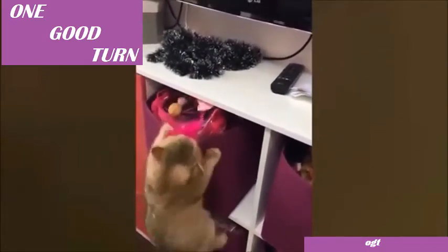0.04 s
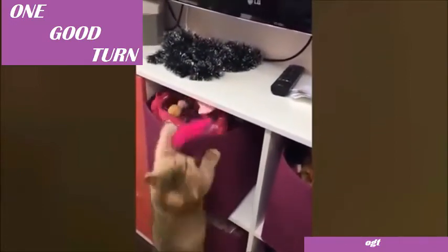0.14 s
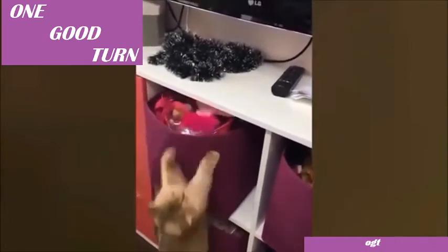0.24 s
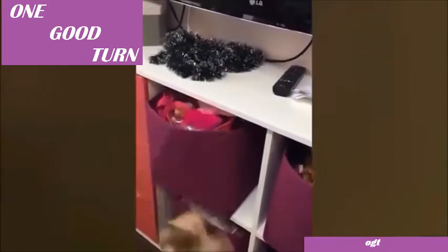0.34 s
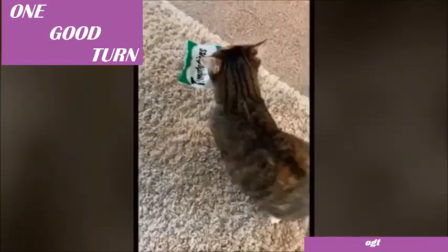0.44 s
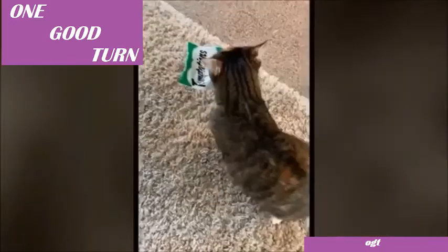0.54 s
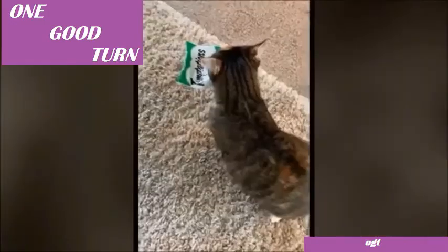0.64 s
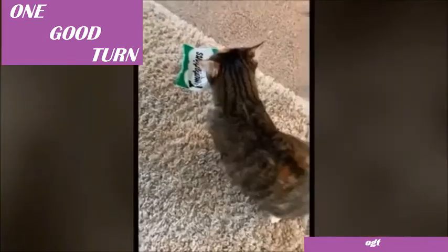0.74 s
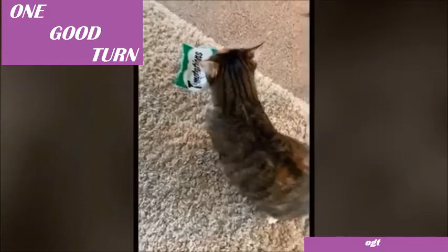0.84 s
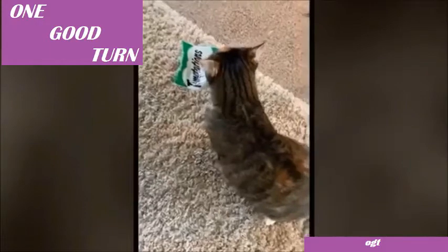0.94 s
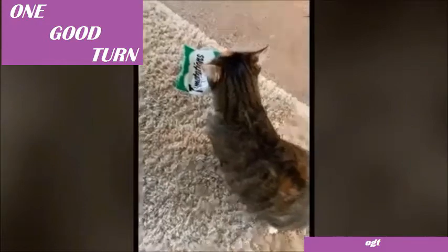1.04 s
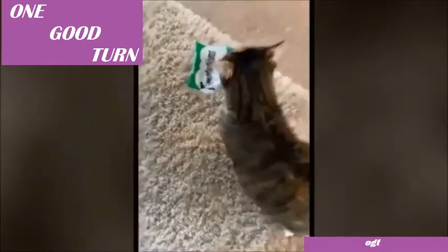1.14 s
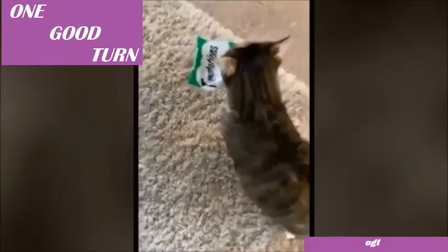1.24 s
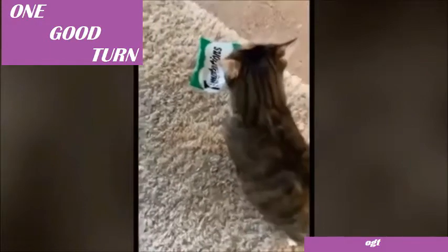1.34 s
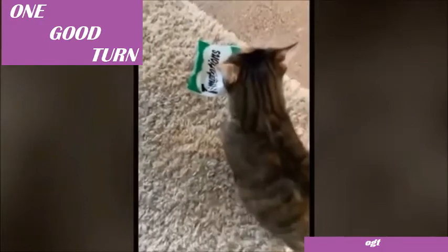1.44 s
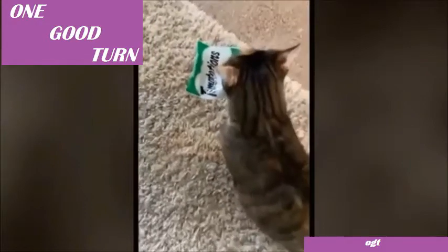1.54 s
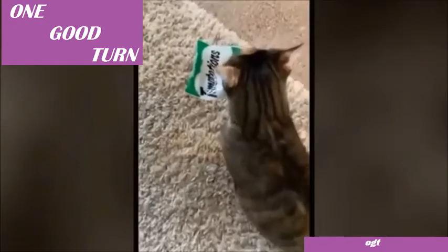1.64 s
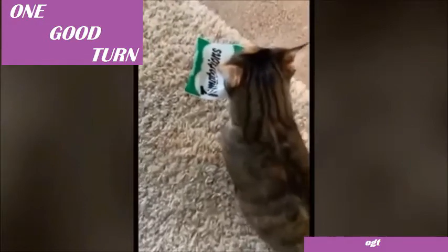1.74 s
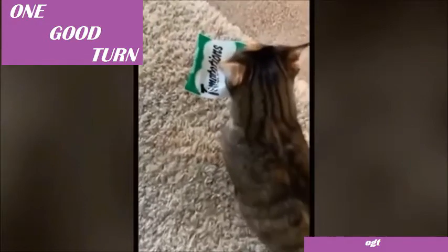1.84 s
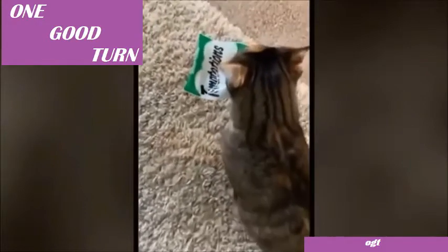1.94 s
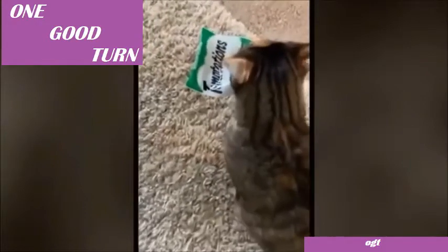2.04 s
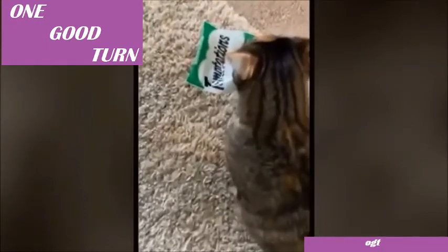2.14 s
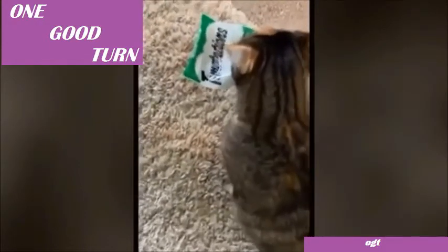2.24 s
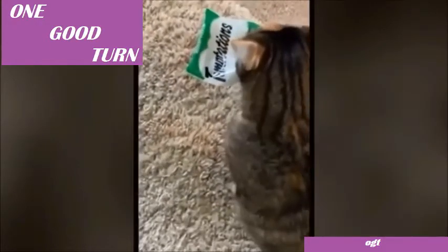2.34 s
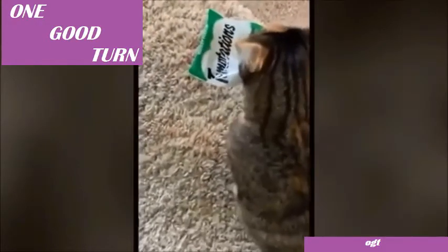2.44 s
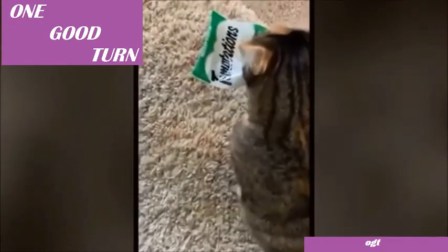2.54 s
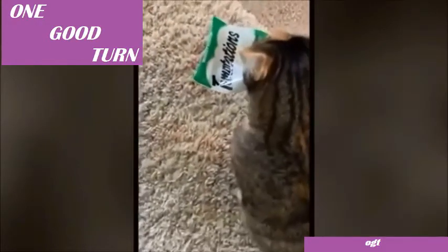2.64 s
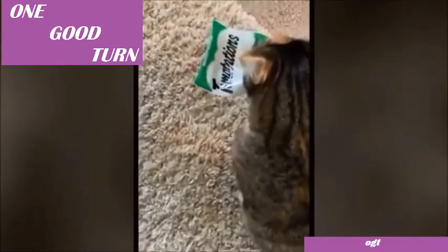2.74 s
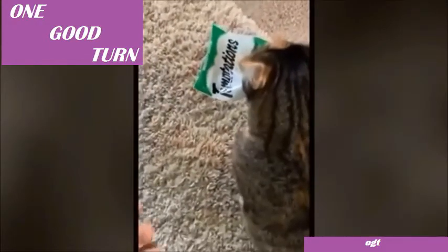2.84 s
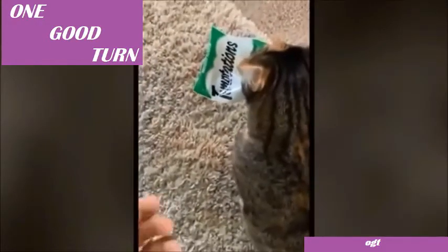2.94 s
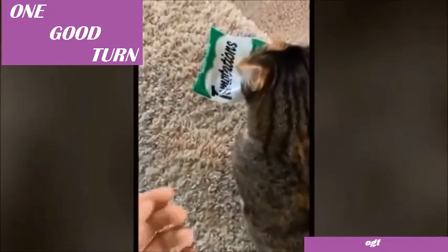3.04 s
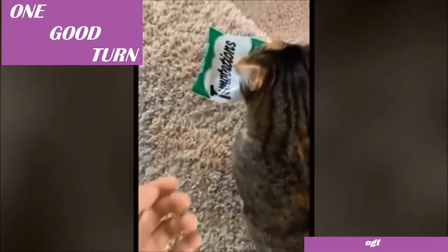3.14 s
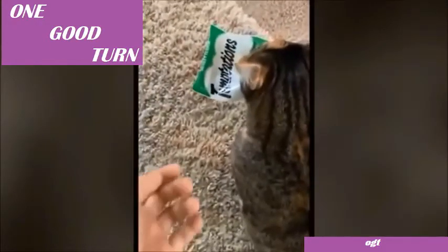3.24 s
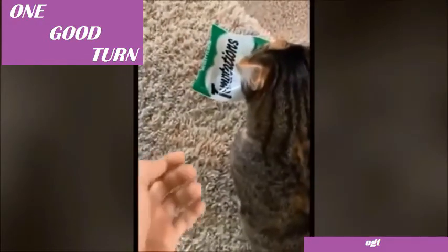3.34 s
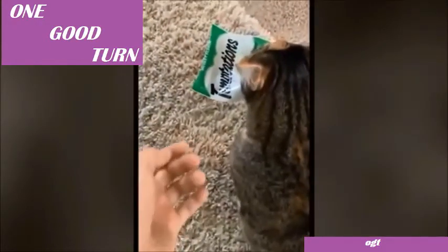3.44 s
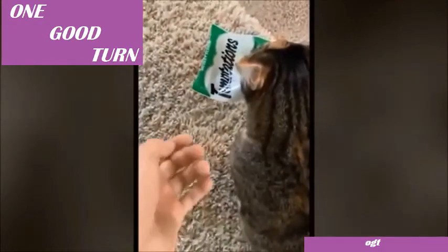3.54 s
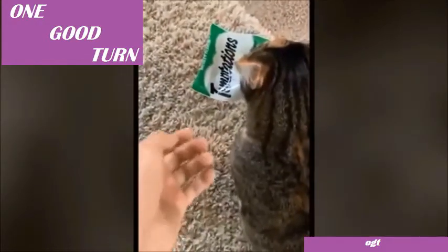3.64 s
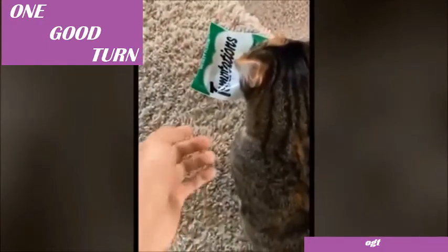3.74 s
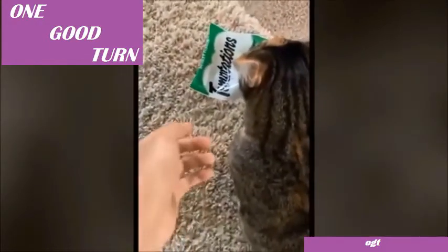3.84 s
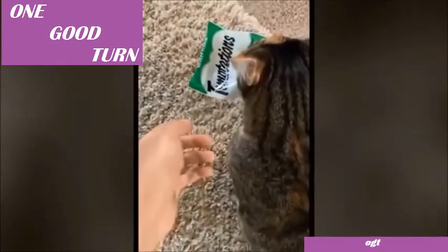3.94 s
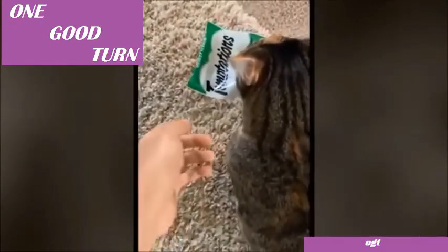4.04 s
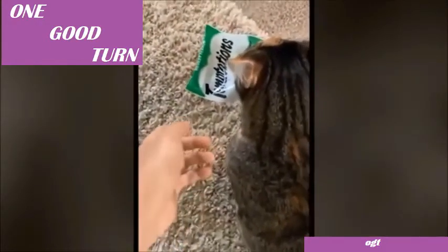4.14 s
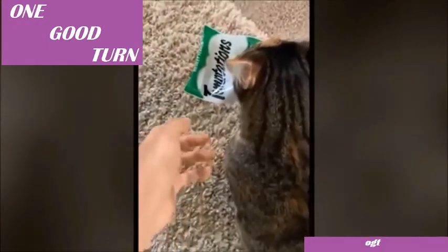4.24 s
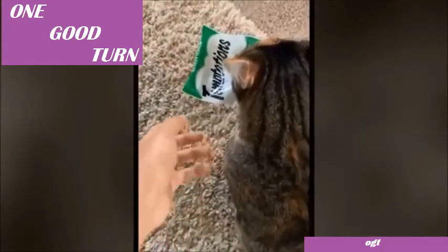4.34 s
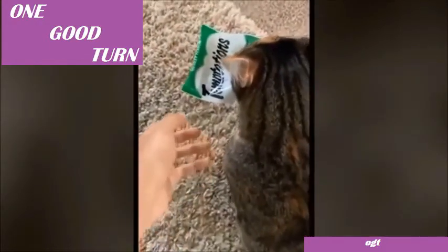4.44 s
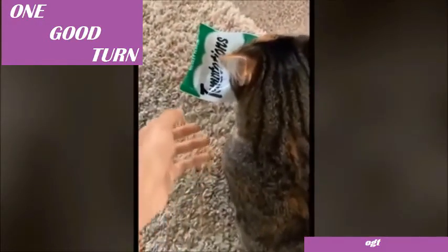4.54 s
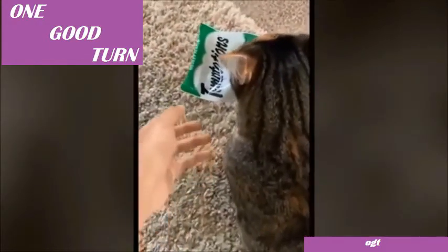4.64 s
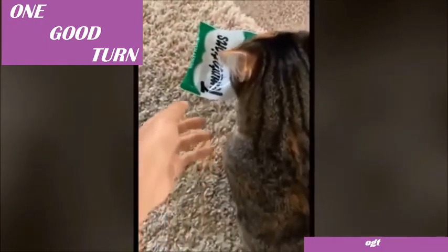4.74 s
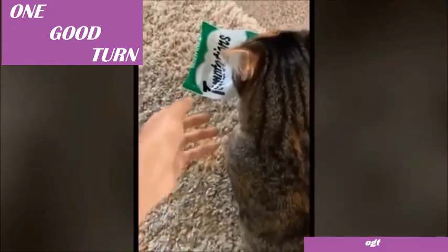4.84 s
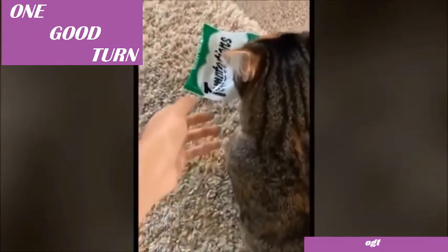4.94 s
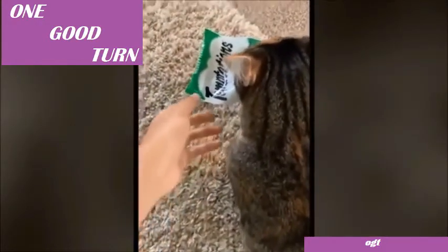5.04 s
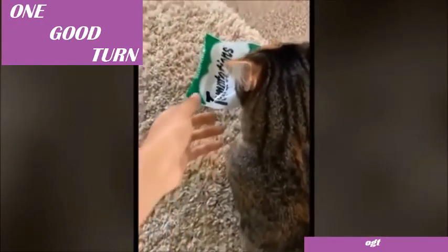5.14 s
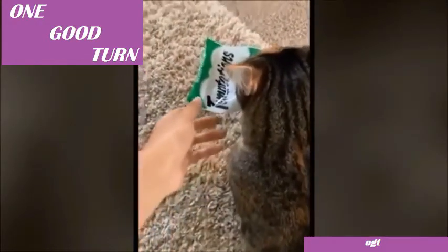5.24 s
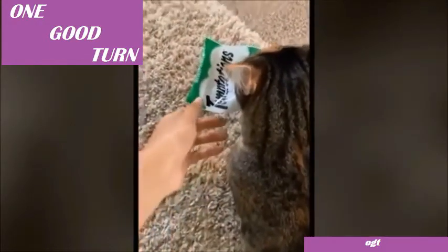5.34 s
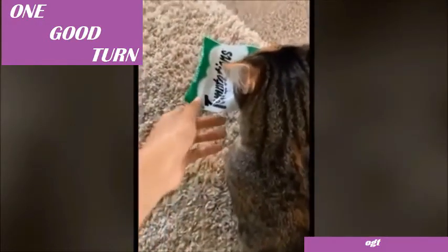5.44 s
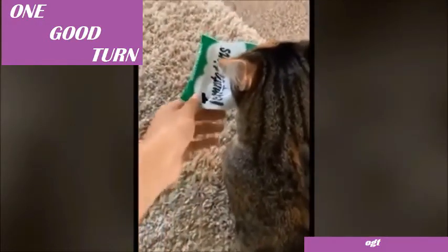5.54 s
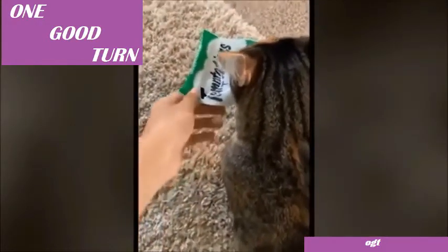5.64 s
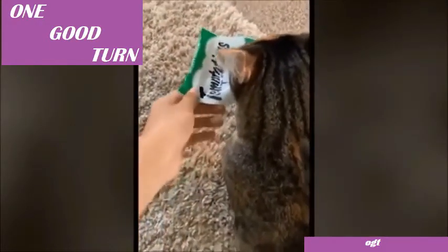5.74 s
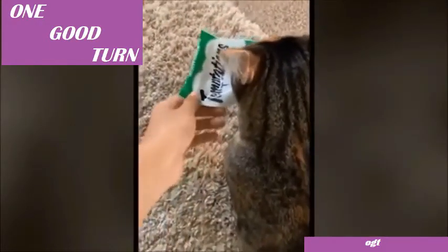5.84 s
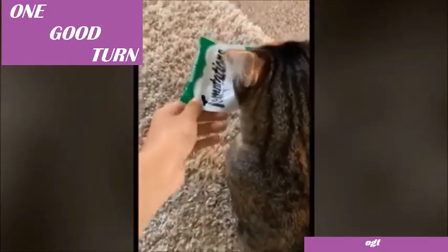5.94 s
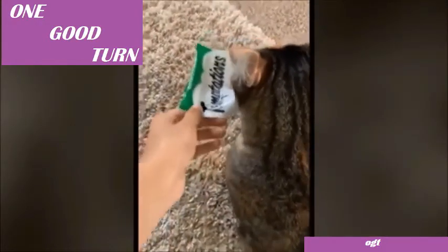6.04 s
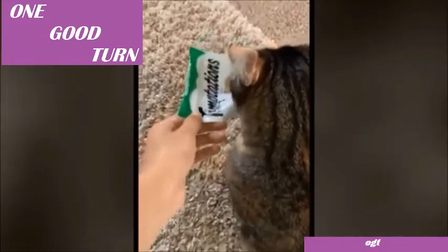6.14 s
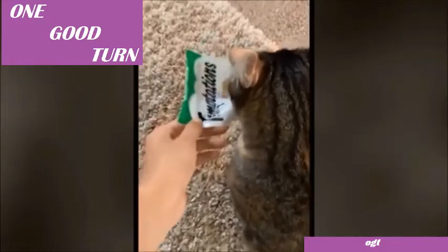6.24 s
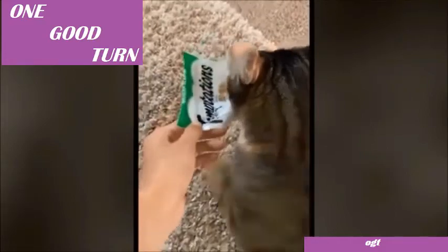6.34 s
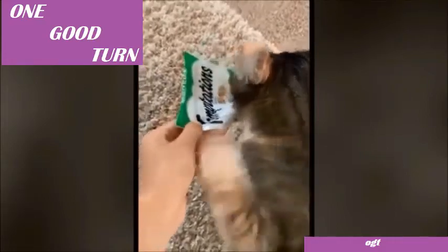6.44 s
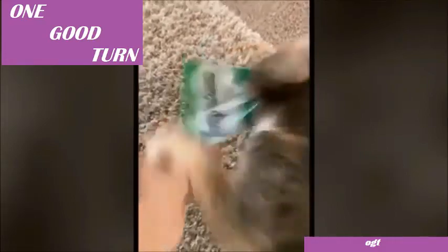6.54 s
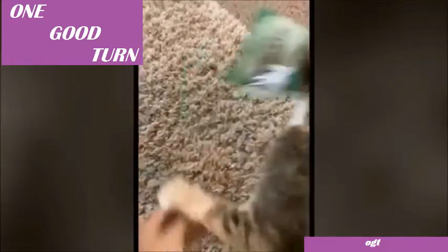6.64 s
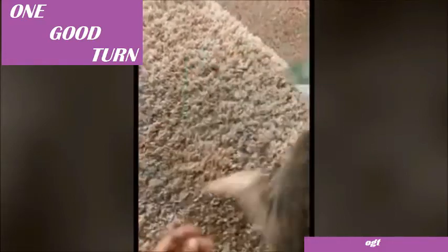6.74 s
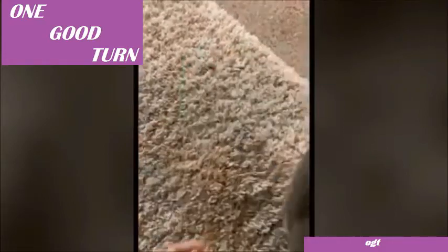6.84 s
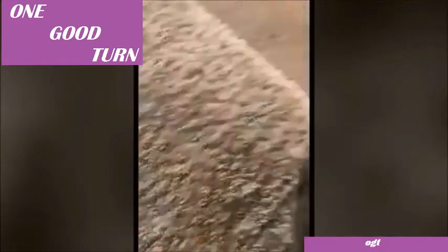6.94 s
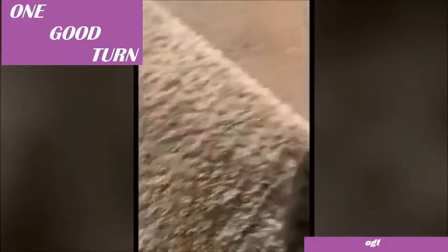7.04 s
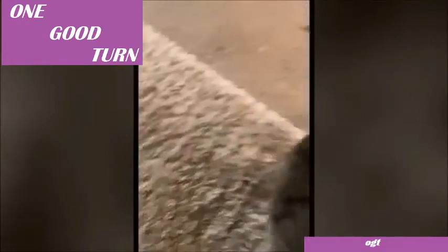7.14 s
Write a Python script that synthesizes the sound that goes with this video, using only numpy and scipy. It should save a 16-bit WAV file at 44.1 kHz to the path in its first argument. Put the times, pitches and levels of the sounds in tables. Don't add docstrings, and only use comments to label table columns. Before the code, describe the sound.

A cat growls low and steadily close by, fades, then snarls harder as a plastic bag crackles and a paw swats it.

```python
import sys
import numpy as np
from scipy import signal
from scipy.fft import rfft, irfft
from scipy.io import wavfile
from scipy.ndimage import uniform_filter1d

SR = 44100
rng = np.random.default_rng(int(sys.argv[2]) if len(sys.argv) > 2 else 0)


def bounce(signal):
    frames = np.transpose(np.atleast_2d(signal))
    limited = np.clip(frames, -1, 1)
    pcm = np.round(limited * 32767).astype(np.int16)
    wavfile.write(sys.argv[1], SR, pcm)


def invert_db(x):
    u = np.asarray(x, float) / 20
    return 10 ** u


N = 317520


def evened(x):
    return x / np.sqrt(np.mean(x ** 2) + 1e-20)


def read(points, hz):
    f, value = np.transpose(points)
    return np.interp(np.log(hz + 1), np.log(f + 1), value)


def play(rows):
    s, *columns = np.transpose(rows)
    return [np.interp(np.arange(N) / SR, s, c) for c in columns]


def held(start, end, edge_s):
    t = np.arange(N) / SR
    return np.clip(np.minimum(t - start, end - t) / edge_s + .5, 0, 1)


def colour(x, points):
    return irfft(rfft(x) * invert_db(read(points, np.fft.rfftfreq(len(x), 1 / SR))), len(x))


def resonate(x, hz, width):
    turn = np.exp(2j * np.pi * np.cumsum(hz * np.ones(len(x))) / SR)
    r = np.exp(-np.pi * abs(width) / SR)
    smooth = signal.lfilter([(1 - r) ** 2], [1, -2 * r, r * r], x / turn)
    return 2 * (turn * smooth).real


def modes(x, table):
    return sum((-1) ** k * invert_db(db) * resonate(x, hz, width) for k, (hz, width, db) in enumerate(table))


def wander(seconds):
    span = max(round(seconds * SR), 1)
    return evened(uniform_filter1d(uniform_filter1d(rng.standard_normal(N), span), span))


# start_s, effort_db, pitch_hz, chest_hum_db, mouth_opening_db
STEADY_GROWL = [(.55, -50.5, 124.2, -41.5, -8.5), (.75, -51, 122.4, -43, -6.5),
                (1.2, -50, 122.6, -41.5, -6.5), (1.75, -49, 125, -44.5, -3),
                (1.97, -48, 125.9, -44.5, -3.5), (2.06, -48.5, 121.9, -45.5, -3.5),
                (2.27, -48.5, 120.5, -44, -3.5), (2.38, -47.5, 128.8, -43.5, -8),
                (2.58, -47, 127.2, -43.5, -6), (2.69, -48, 121, -43, -7), (2.8, -48.5, 124.3, -45.5, -6.5),
                (2.9, -48, 123.5, -46.5, -6.5), (3.05, -49, 123, -48, -6), (3.17, -47.5, 122.3, -45, -6),
                (3.27, -47.5, 122.7, -47, -9), (3.39, -50, 115.3, -47, -7.5), (3.84, -50, 115, -47.5, -9),
                (4.02, -50, 116.9, -50.5, -6.5), (4.24, -50.5, 114.9, -50.5, -6.5),
                (4.445, -50, 134.1, -45.5, -5.5)]
FADING_GROWL = [(4.459, -62, 172, -41.5, -18), (4.51, -62, 196.9, -44, -20),
                (4.572, -63, 186.7, -41, -21.5), (4.582, -60, 166.9, -40, -21.5),
                (4.6, -54.5, 143.6, -44, -22.5), (4.685, -58, 143.7, -43, -23.5),
                (4.698, -55.5, 142.8, -40.5, -19.5), (4.754, -60.5, 143, -45.5, -20.5),
                (4.822, -57, 124, -49, -20), (4.873, -61.5, 126.3, -48, -26), (4.913, -67, 169, -49.5, -24),
                (4.94, -74, 159.8, -56, -19), (4.955, -80, 105.4, -55, -19.5),
                (5.01, -83, 95.4, -59, -18.5)]
SNARL = [(5.958, -69, 99.84, -58, -4.5), (5.985, -48, 105.1, -48, -12), (6.046, -43.5, 117.1, -41, -11),
         (6.115, -44.5, 118.1, -45, -10), (6.14, -41.5, 128.9, -37, -6.5), (6.198, -41, 130.1, -38, -8.5),
         (6.272, -40, 133.3, -38.5, -9.5), (6.352, -34, 148.2, -29, -11.5), (6.426, -34, 146.1, -32.5, -17),
         (6.489, -40.5, 142.4, -38.5, -2), (6.521, -36.5, 143.7, -34, -12.5),
         (6.55, -37, 145.3, -29.5, -16), (6.58, -38.5, 142.7, -24, -14.5), (6.593, -34.5, 137.8, -26.5, -9)]
RECOIL = [(6.61, -42.5, 111.1, -39.5, -9), (6.65, -43, 109, -34, -5.5), (6.68, -42.5, 107.9, -39, -3),
          (6.72, -41.5, 103, -40, -7.5), (6.755, -42.5, 102.2, -39, -10.5), (6.785, -43, 107.9, -44, -9),
          (6.805, -45.5, 134, -32, -9), (6.87, -46, 145.1, -33, -9), (6.93, -47, 133, -35, -11),
          (6.99, -47.5, 129.6, -32.5, -10), (7.03, -50.5, 124.8, -36.5, -11), (7.085, -49, 137.3, -34, -13),
          (7.14, -49, 127, -33.5, -10), (7.19, -49.5, 129.6, -33.5, -9)]
# centre_s, length_s, pitch_rise_hz
GULPS = [
    (2.156, 0.092, 6.5),
    (2.446, 0.12, 6.13),
    (2.978, 0.072, 9.1),
    (3.898, 0.07, 5.14),
    (4.34, 0.042, 7.6),
]


def phrases():
    def rest(s, row):
        return [(s, -95, row[2], -95, row[4])]

    pause = rest(5.06, FADING_GROWL[-1]) + rest(5.94, SNARL[0])
    effort_db, hz, hum_db, mouth_db = play(STEADY_GROWL + FADING_GROWL + pause + SNARL + RECOIL)
    rise_hz = sum(up_hz * held(s - length / 2, s + length / 2, 0.0056) for s, length, up_hz in GULPS)
    return effort_db, hz + rise_hz, hum_db + 0.25 * rise_hz, mouth_db - 0.5 * rise_hz


def chest(turns, hum_db, octave_db, split_db, shimmer_db):
    sway = turns + .028 * wander(.009)
    tone = invert_db(hum_db + np.minimum(shimmer_db, 1.7) * wander(.007)) * np.cos(2 * np.pi * sway + .6)
    octave_turns = sway + .004 * split_db * wander(.008)
    tone += invert_db(octave_db + shimmer_db * wander(.007)) * np.cos(4 * np.pi * octave_turns - .9)
    half_lines = np.cos(3 * np.pi * turns) + invert_db(-6.5) * np.cos(7 * np.pi * turns)
    tone += invert_db(octave_db - 25 + split_db + 0.98 * wander(0.081)) * half_lines
    return np.sqrt(2) * tone


# start_s, share_of_first, place_in_cycle (0-1)
REBOUND = [(.55, 0.19, 0.49), (1.2, 0.45, 0.51), (2, 0.15, 0.47), (2.6, 0.26, 0.44), (3.2, 0.17, 0.48),
           (3.5, 0.4, 0.47), (4, 0.31, .45), (4.45, 0.33, .45), (6, .2, 0.5), (7.2, 0.33, 0.44)]


def fold_drive(turns, hz, split_db, shimmer_db, rough):
    cycle = np.maximum.accumulate(turns + .014 * wander(.004)).astype(int)
    strength = invert_db(.9 * rng.uniform(-1, 1, N)[cycle] * shimmer_db)
    strength = strength * invert_db(-.22 * np.minimum(split_db, 20) * (cycle % 2))
    share, place = play(REBOUND)
    second_cycle = np.maximum.accumulate(turns - place + 1).astype(int)
    first = np.diff(cycle, prepend=0)
    second = np.diff(second_cycle, prepend=0)
    slaps = evened((first + share * second) * strength / np.sqrt(hz))
    single_slaps = evened(first * strength / np.sqrt(hz))
    puffs = evened((.45 + np.exp(-(turns % 1) / .4)) * rng.standard_normal(N))
    drive = np.sqrt(1 - rough) * slaps + np.sqrt(rough) * puffs
    deep = np.sqrt(1 - rough) * single_slaps + np.sqrt(rough) * puffs
    airy = np.sqrt(.85) * drive + np.sqrt(.15) * puffs
    return drive, deep, airy, puffs


# centre_hz, width_hz, level_db
LOWER_THROAT = [(367.5, 71, 1.5), (471.6, 92, 2.5), (650, 394, -6)]
# centre_hz, width_hz, level_db
UPPER_THROAT = [(1274, 250, 5.5), (1470, 120, 4.5), (1640, 190, 4.5), (2500, 1460, -6.5)]
# start_s, nose_hz, nose_db, favoured_mouth_hz, mouth_lift_db
TONGUE = [(.55, 994, 3.5, 1525, 5), (.82, 950, 6, 1470, 7), (.95, 963, 4.5, 1344, 2),
          (1.25, 978, 4.5, 1384, 6), (1.38, 976, 3.5, 1500, 8), (1.6, 1004, 3.5, 1467, 9),
          (1.88, 1046, 1, 1507, 0), (2.34, 1025, 4.5, 1557, 1), (2.42, 969.4, -1, 1470, 4),
          (2.53, 935.6, 3, 1495, 8), (2.62, 1046, 4, 1640, 1), (2.92, 1040, 1, 1640, -3),
          (2.98, 960, 2.5, 1460, 9), (3.08, 1020, 2, 1450, 6.5), (3.3, 986, 4.5, 1460, 12),
          (3.44, 963.3, 2.5, 1635, -1), (3.86, 930.5, 4, 1660, -6), (4.0, 1050, 1.5, 1610, 4),
          (4.19, 1070, 2, 1657, -2.5), (4.42, 1001, 2.5, 1640, -5), (4.9, 944, 0, 1497, 5),
          (5.97, 954, 2.5, 1601, 1.5), (6.15, 933, 7, 1630, -2), (6.35, 958, 3, 1630, -7),
          (6.55, 950.5, 0, 1550, 11), (6.6, 1038, 0, 1346, 4), (6.65, 1040, 2, 1340, 1),
          (6.665, 1148, -1, 1430, 0), (6.7, 1100, 7, 1440, 11), (6.715, 900, -2, 1241, 6),
          (6.78, 915, -6, 1202, 12), (6.8, 920, 3, 1185, -1), (6.86, 878, 1, 1130, 16),
          (6.88, 893, 0.5, 1450, 6), (7.2, 896, 1.5, 1454, 2)]
# start_s, centre_hz, level_db
LIPS = [(.55, 3600, 3), (.75, 3680, -0.5), (1.2, 3660, 1), (1.45, 3610, 0.5), (2.0, 3510, 2),
        (2.3, 3500, 2.5), (2.46, 3500, 2), (2.63, 3580, 0), (3.1, 3600, 1), (3.6, 3620, 1), (3.95, 3550, 3),
        (4.44, 3630, 0), (5.95, 3799, -4), (6.12, 3850, 2), (6.14, 3900, 5), (6.22, 3870, 1),
        (6.26, 3880, 4), (6.36, 3796, 1), (6.6, 3830, 5), (6.8, 3773, 5.5), (7.2, 3730, 0)]


def throat(drive, deep, airy, puffs, mouth_db, jaw, gape):
    nose_hz, nose_db, tongue_hz, tongue_db = play(TONGUE)
    lower = evened(modes(deep, LOWER_THROAT) - invert_db(nose_db) * resonate(drive, nose_hz, 189))
    cheek_hz = 456 + 83.96 * gape
    cheek_db = -97 + 104.5 * jaw
    lower += invert_db(cheek_db) * evened(resonate(drive, cheek_hz, 99)) / 3

    favoured = invert_db(tongue_db + 8.0) * resonate(drive, tongue_hz, 78)
    upper = evened(modes(airy, UPPER_THROAT) + favoured)
    rasp_hz, rasp_width_hz, rasp_db = 2514, 784, -10.5
    upper += invert_db(rasp_db + 0.58 * (mouth_db + 10.5)) * evened(resonate(airy, rasp_hz, rasp_width_hz))
    teeth_db = -17 - 7 * gape + .9 * (mouth_db + 8) + 1.2 * wander(.01)
    lips_hz, lips_db = play(LIPS)
    teeth = resonate(airy + .5 * puffs, lips_hz + 25 * wander(0.034), 280)
    upper += invert_db(teeth_db + lips_db) * evened(teeth)
    return lower, upper


# start_s, drop (0-1)
JAW = [
    (5.8, 0.34),
    (5.95, 0.67),
    (6.56, 0.73),
    (6.6, 1),
    (6.77, 0.99),
    (6.8, 0.66),
    (7.2, 0.58),
]
# octave_hz, level_db (re effort)
OCTAVE = [(200, 8), (232, 8), (246, 4.5), (264, 1), (285, -2), (296, -4.5), (370, -13)]
# start_s, end_s, octave_loss_db (added), half_line_gain_db
SPLITS = [
    (4.271, 4.454, 4, 5),
    (4.61, 4.902, -1, 12.5),
    (6.123, 6.337, 0, 17.5),
    (6.34, 6.61, -18.5, 33),
    (6.603, 6.79, -5, 23),
    (6.797, 7.299, 1.5, 14.5),
]


def growl():
    effort_db, hz, hum_db, mouth_db = phrases()
    jaw = np.clip(play(JAW)[0], 0, 1)
    gape = np.clip(4 * jaw - 3, 0, 1)
    shut = np.clip((-mouth_db - 14) / 8, 0, 1)
    loss_db, split_db = sum(np.outer(row[2:], held(*row[:2], 0.0076)) for row in SPLITS)
    octave_db = effort_db + read(OCTAVE, 2 * hz) + 8 * shut + loss_db
    rough = .13 + .3 * shut + .36 * jaw ** 5
    shimmer_db = 1.2 + 2.5 * rough
    turns = np.cumsum(hz * (1 + (.008 + .03 * rough) * wander(.014))) / SR
    tone = chest(turns, hum_db, octave_db, split_db, shimmer_db)
    source = fold_drive(turns, hz, split_db, shimmer_db, rough)
    lower, upper = throat(*source, mouth_db, jaw, gape)
    return tone, -invert_db(effort_db) * (lower + invert_db(mouth_db) * upper)


# centre_hz, level_db (per Hz)
RUMBLE = [(15, -55), (25, -21), (70, 1.5), (221, -20), (319, -20.5), (579, -27), (958, -27), (1100, -28),
          (1260, -28.5), (1950, -33.5), (2290, -38), (6000, -47), (7800, -61), (13200, -120)]
# centre_hz, level_db
FIZZ_LOW = [(2400, -0.5), (4100, -3), (6600, -8), (7300, -8), (8000, -17.5), (9000, -60)]
# centre_hz, level_db
FIZZ_HIGH = [(7000, -16), (8300, -3), (9000, 0), (12800, -1), (14900, -3.5), (16000, -22)]
# centre_s, length_s, fizz_db
BRUSHES = [
    (0.65, 0.25, -70.5),
    (1.02, 0.39, -71.5),
    (2.406, 0.72, -68.5),
    (3.098, 1, -71),
    (3.796, 1, -75),
    (4.85, 0.39, -76),
    (5.971, 0.1, -59),
    (6.284, 0.14, -73),
    (6.56, 0.55, -64),
    (7.157, 0.82, -65.5),
]
# start_s, top_edge_hz, hiss_db
TREBLE = [(.5, 15010, 1.5), (1.15, 15050, -0.5), (1.3, 15000, 0.5), (2.08, 15000, -0.5), (2.12, 15050, 0),
          (5.36, 15050, 0), (5.365, 13600, 9), (5.385, 13800, -1), (5.41, 14600, 1), (5.6, 14300, -3.5),
          (5.8, 14300, -0.5), (5.91, 15070, 1), (5.925, 16100, -8), (5.945, 16050, 9), (5.96, 14900, -1.5),
          (6.38, 14900, 3.5), (6.39, 15400, 0), (6.5, 15300, 2), (6.52, 15050, -1.5), (7.2, 15050, 0.5)]


def air():
    t = np.arange(N) / SR
    swell_db = 1.0 * wander(.04)
    rumble = invert_db(-56.5 + swell_db) * evened(colour(rng.standard_normal(N), RUMBLE))
    effort_db = np.minimum(phrases()[0], -48)
    brush = sum(invert_db(db) * np.cos(np.pi * np.clip((t - s) / length, -.5, .5)) for s, length, db in BRUSHES)
    fizz = np.zeros(N)
    for band, rest_db, breath_db, brush_db in ((FIZZ_LOW, -72.5, -20, 4.5), (FIZZ_HIGH, -78.5, -43, -1.5)):
        breath = invert_db(effort_db + breath_db)
        level = np.sqrt(invert_db(rest_db) ** 2 + breath ** 2 + (invert_db(brush_db) * brush) ** 2)
        fizz += level * evened(colour(rng.standard_normal(N), band))
    flutter_db = 0.35 * swell_db + 0.61 * wander(0.0064) + play(TREBLE)[1]
    band_hiss = evened(resonate(rng.standard_normal(N), 7800, 900))
    fizz += invert_db(-87) * held(4.55, 8, .2) * band_hiss
    return rumble + invert_db(flutter_db) * fizz


# start_s, peak_db, crease_pitch_hz, level_over_6_khz_db (re peak), burst_t60_s
SNAPS = [(1.03, -61, 5000, 8, 0.036), (2.106, -45, 2962, -29, 0.17), (5.3692, -34.5, 2310, -8, 0.027),
         (5.385, -41, 1300, -25, .02), (5.392, -42, 1500, -25, 0.023), (5.417, -50, 2000, -17, 0.019),
         (5.425, -56, 2000, -20, .015), (5.9356, -21, 2630, -3, 0.012), (5.9379, -34, 3207, -3, 0.018),
         (6.0066, -24, 2589, -9, 0.013), (6.018, -46, 2500, -25, .012), (6.1324, -33, 2370, -28, 0.013),
         (6.127, -51, 3500, -25, .02), (6.045, -47, 3002, -27, .015), (6.158, -51, 3800, -25, .012),
         (6.187, -47, 2600, -25, .012), (6.2287, -30, 2500, -21, 0.015), (6.235, -38.5, 3500, -22, .03),
         (6.2645, -31, 3016, -14, 0.021), (6.283, -53, 7000, 1, .03), (6.2896, -32.5, 2390, -8.5, 0.018),
         (6.378, -33, 2500, -25, 0.016), (6.3882, -23.5, 2800, -1, 0.014), (6.394, -22, 3100, -5, 0.015),
         (6.4148, -19.5, 2730, -0.5, 0.02), (6.4361, -16, 2800, -17, 0.033),
         (6.447, -16.5, 2000, -22, 0.022), (6.453, -31, 3050, -5, 0.016), (6.462, -24, 3122, -13, 0.024),
         (6.479, -24, 3200, -14, 0.016), (6.486, -22.5, 3250, -11, 0.025), (6.487, -23.5, 7200, -3, 0.036),
         (6.596, -31, 860, -40, 0.022), (6.6644, -28.5, 3500, -10, 0.024)]
# pitch_factor, width_factor (on pitch), level_db
FILM = [(.55, .6, -8), (1, .7, 0), (1.7, .9, -8)]
# centre_hz, width_hz, level_db
EDGE = [(5500, 2500, -9), (9000, 3500, 0), (12500, 3000, -7), (14800, 1500, -10)]


def snaps():
    out, t = np.zeros(N + 4000), np.arange(4000) / SR
    chance = rng.standard_normal((len(SNAPS), 4000))
    for (s, db, hz, high_db, t60), jolts in zip(SNAPS, chance):
        fizz = jolts * invert_db(-60 * t / max(t60, .002)) * np.minimum(t / 0.00034, 1)
        click = (np.arange(4000) == 20) * 5 * (.02 / max(t60, .006)) ** 2
        burst = fizz + click
        body = modes(burst, [(hz * f, hz * width, d) for f, width, d in FILM])
        late = np.roll(burst, round(0.0027 * SR))
        push = resonate(burst, 620, 540) + invert_db(5.0) * resonate(resonate(late, 314.0, 170), 283.0, 180)
        edge = modes(fizz + .15 * click, EDGE)
        levels = ((0, body), (-13.5, push), (high_db, edge))
        parts = [invert_db(d) * p / abs(p).max() for d, p in levels]
        out[round(s * SR) - 10:][:4000] += invert_db(db) * sum(parts)
        lead_in = np.diff(jolts[-401:]) * np.exp((t[:400] - t[400]) / 0.0019)
        out[round(s * SR) - 400:][:400] += invert_db(db - 31) * lead_in
    return out[:N]


# centre_hz, width_hz, level_db
TAUT = [(290, 100, -10.5), (690, 160, -8.5), (1220, 330, -5), (1500, 350, 5.5), (2320, 250, -2.5),
        (3100, 350, -12), (3410, 260, -6.5), (4160, 460, -19), (5150, 400, -17), (5930, 600, -12),
        (6900, 900, -13), (7730, 500, -20), (8990, 600, -11), (11000, 2500, -20)]


def flick():
    clicks = np.zeros(3000)
    clicks[[10, 56]] = 1, .6
    ring = np.zeros(3000)
    for k, (hz, width, db) in enumerate(TAUT):
        lag = round(0.86 * SR / hz) * (hz < 1000)
        ring += (-1) ** k * invert_db(db) * resonate(np.roll(clicks, lag), hz, width) / width
    out = np.zeros(N)
    out[round(5.3698 * SR) - 10:][:3000] = invert_db(-21) * ring / abs(ring).max()
    return out


# start_s, crackle_db, treble_db (re crackle)
SWAT = [(6.365, -68, -6), (6.385, -46, -4), (6.405, -44, -6), (6.413, -31, -3), (6.423, -29, 0),
        (6.428, -38, 5), (6.434, -37, 3), (6.437, -27, -3), (6.443, -29, 1), (6.446, -33.5, -2),
        (6.449, -27, 2), (6.454, -31, -2), (6.457, -34.5, -6), (6.462, -32, -2), (6.468, -32.5, 1),
        (6.473, -40, -6), (6.481, -40, 1), (6.485, -42, -6), (6.497, -53, 0), (6.505, -79, 0),
        (6.56, -71, 0)]
# centre_hz, level_db (per Hz)
CRUMPLE = [(120, -8), (200, -1), (304, -3), (479, -38), (653, -1), (755, -31), (827, -8.5), (1590, -9),
           (1780, -15), (2850, -10.5), (4030, -17), (11000, -20), (15500, -28)]
# start_s, peak_db, pitch_hz
PAW = [
    (6.418, -22, 300),
    (6.437, -28, 427),
    (6.444, -19, 325),
    (6.456, -27, 258),
]


def swat():
    t = np.arange(N) / SR
    ticks = (rng.random(N) < 6000 / SR) * rng.standard_normal(N)
    ticks = ticks * invert_db(3.0 * np.minimum(rng.exponential(1, N), 3))
    before, after = [(SWAT[0][0] - .01, -95, 0)], [(SWAT[-1][0] + .04, -95, 0)]
    force_db, treble_db = play(before + SWAT + after)
    spray = evened(colour(ticks, CRUMPLE))
    dull = signal.sosfiltfilt(signal.butter(2, 4500, fs=SR, output="sos"), spray)
    thuds = np.zeros(N)
    for s, db, hz in PAW:
        since = np.maximum(t - s, 0)
        thuds += invert_db(db - 60 * since / .03) * np.sin(2 * np.pi * hz * since)
    return invert_db(force_db + 6.5) * (dull + invert_db(treble_db) * (spray - dull)) + thuds


# centre_hz, t60_s
ROOM = [(200, 0.43), (1000, 0.2), (4000, 0.3), (12000, 0.18)]
# centre_hz, level_db
WALLS = [(200, 2.5), (1500, 0), (4000, -1), (12000, -3)]


def room(x):
    hz, t, z = signal.stft(rng.standard_normal(SR // 2), SR, nperseg=256)
    decay_db = read(WALLS, hz)[:, None] - 60 * t / read(ROOM, hz)[:, None]
    tail = signal.istft(z * invert_db(decay_db), SR, nperseg=256)[1]
    gap_s = 0.0086
    tail = tail * np.clip(np.arange(len(tail)) / SR / gap_s - .5, 0, 1)
    return signal.fftconvolve(x, tail / np.linalg.norm(tail))[:N]


def scene():
    tone, buzz = growl()
    bag = snaps() + swat()
    tap = flick()
    wet = room(invert_db(-13) * buzz + invert_db(-13.5) * bag + invert_db(-17.0) * tap)
    near = buzz + bag + tap + wet
    bass_cut = signal.butter(3, 80, "high", fs=SR, output="sos")
    return (signal.sosfiltfilt(bass_cut, tone) + signal.sosfilt(bass_cut, near) + air())[None]


def gate(x):
    hz, t, z = signal.stft(x, SR, nperseg=1024)
    power = abs(z) ** 2
    near_power = uniform_filter1d(uniform_filter1d(power, size=2, axis=1), size=3, axis=2)
    power_db = 10 * np.log10(abs(near_power) + 1e-20)
    around_db = uniform_filter1d(uniform_filter1d(power_db, size=25, axis=1), size=5, axis=2)
    masked = 10 * np.log10(2 * power.sum(1, keepdims=True) / 1.5 + 1e-20) > -52
    floor_db = -108
    limit_db = np.maximum(floor_db, np.where(masked, around_db - 2.5, floor_db))
    treble = np.clip(hz / 3500 - .5, 0, 1)[:, None]
    weak = np.clip((limit_db - power_db) / 4 + .5, 0, 1) * treble
    s, top_hz, _ = np.transpose(TREBLE)
    over = np.clip((hz[:, None] - np.interp(t, s, top_hz)) / 300 + .5, 0, 1)
    return signal.istft(z * invert_db(-14 * weak - 30 * over), SR, nperseg=1024)[1][:, :N]


def roll_off(x):
    return signal.sosfilt(signal.butter(12, 16180, fs=SR, output="sos"), x)


def record(dry):
    limited = .3 * np.tanh(dry / .3)
    top_cut = signal.firwin(511, 15900, window=("kaiser", 7), fs=SR)[None]
    start = np.clip((np.arange(N) / SR - 0.5148) / 0.0038, 0, 1)
    mix = gate(signal.oaconvolve(limited, top_cut, "same")) * start
    return roll_off(mix)


dry = scene()
out = record(dry)
bounce(out)
```